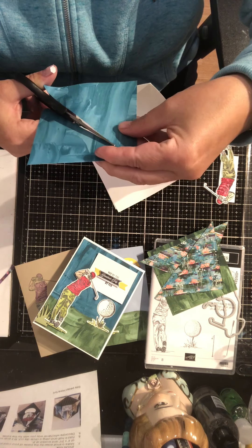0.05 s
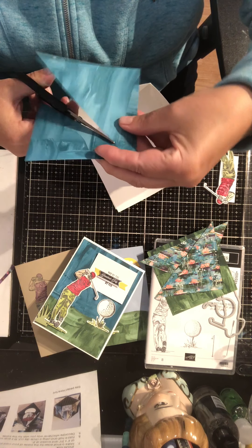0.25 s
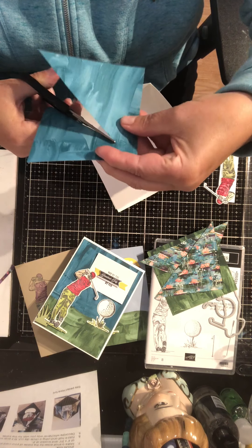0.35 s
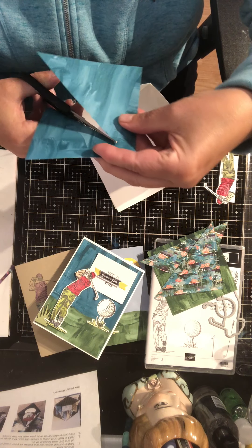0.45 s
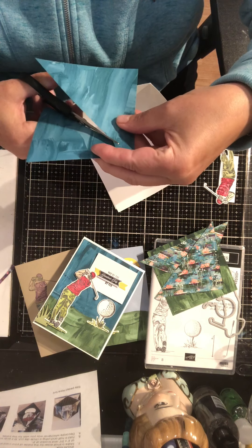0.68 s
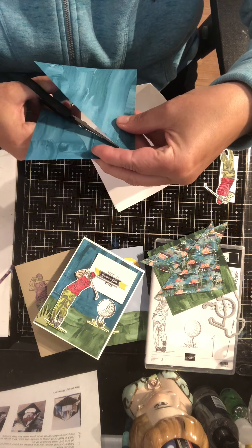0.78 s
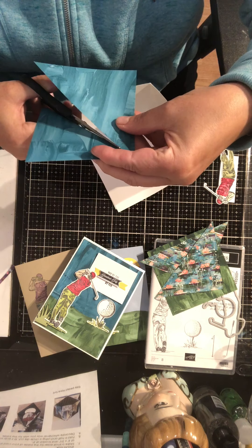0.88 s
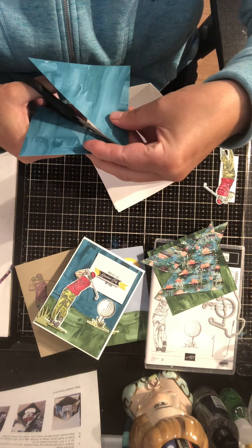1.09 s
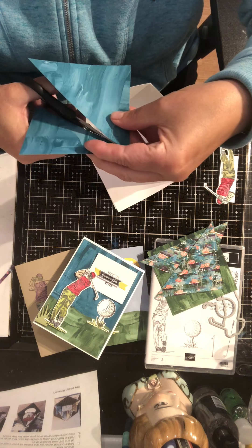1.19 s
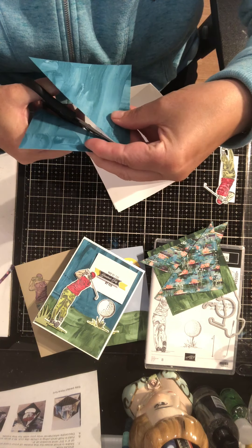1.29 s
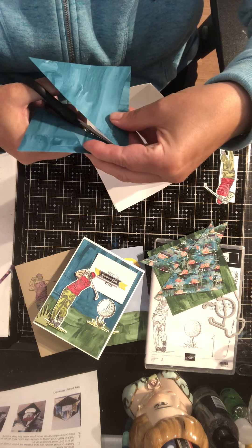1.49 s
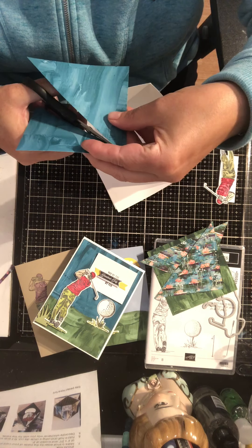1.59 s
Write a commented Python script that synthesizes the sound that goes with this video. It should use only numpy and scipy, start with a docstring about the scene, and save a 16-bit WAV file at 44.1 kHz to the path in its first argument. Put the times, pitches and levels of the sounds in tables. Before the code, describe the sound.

Small scissors cut stiff paper close to a phone microphone in a quiet room: brief crunches, one loud clack as the blades shut, a smooth opening hiss, then softer snips and slides.

```python
"""Crunchy bites come first: small scissors snip paper close to a phone microphone in a quiet room.
The blades then knock shut with a loud clack and a low thump; opening, they slide with a smooth hiss.
Bites and slides are grainy noise and knocks are short pushes, all ringing the same blades and sheet.
Room echo and steady room tone surround them; a faint low hum swells near the end."""
import sys
import numpy as np
from scipy import signal
from scipy.fft import rfft, irfft
from scipy.io import wavfile

SR = 44100
rng = np.random.default_rng(int(sys.argv[2]) if len(sys.argv) > 2 else 0)


def gain_from_decibels(decibels):
    """Convert decibel values to linear amplitude factors."""
    exponent = np.asarray(decibels, float) / 20
    return 10 ** exponent


def log_audio(samples):
    """Write samples as a 16-bit WAV file to the path given in sys.argv[1]."""
    # one column per channel
    frames = np.atleast_2d(samples).T
    # limit to full scale, then quantise
    limited = np.clip(frames, -1, 1)
    pcm = np.round(limited * 32767).astype(np.int16)
    wavfile.write(sys.argv[1], SR, pcm)


N = 72765  # length in samples, 1.65 s


def read_spectrum(points, hz):
    """Reads a (pitch, value) table with straight lines between points on a log-pitch axis."""
    pitch_hz, value = np.transpose(points)
    return np.interp(np.log(hz + 1), np.log(pitch_hz + 1), value)


def favour(boost_db, favoured_hz):
    """Resonances near the favoured pitch are stirred harder."""
    width_octaves = 0.23
    return lambda hz: boost_db * np.exp(-(np.log2(hz / favoured_hz) / width_octaves) ** 2)


def fibres(size, grain_db):
    """Noise of tearing or rubbing fibres: short grains of unequal strength."""
    grains_per_s = 3100
    grain_levels_db = grain_db * np.minimum(rng.exponential(1, size), 4)
    grain_number = (np.arange(size) * grains_per_s / SR).astype(int)
    noise = rng.standard_normal(size) * gain_from_decibels(grain_levels_db[grain_number])
    return noise / np.sqrt(np.mean(noise ** 2))


def ring(drive, modes, stir_db):
    """Sums resonances of alternate sign; stir_db(hz) says how hard the drive reaches each."""
    out = 0
    for k, (hz, width_hz, level_db) in enumerate(modes):
        radius = np.exp(-np.pi * width_hz / SR)  # a narrower resonance rings longer
        feedback = [1, -2 * radius * np.cos(2 * np.pi * hz / SR), radius * radius]
        tone = signal.lfilter([1, 0, -1], feedback, drive * gain_from_decibels(stir_db(hz)))
        out = out + (-1) ** k * gain_from_decibels(level_db) * (1 - radius) * tone
    return out


# resonances of blades, handles and sheet: pitch_hz, width_hz, relative level_db
LOW_RING = [(290, 60, -13), (540, 30, 0), (650, 50, -2), (840, 80, -3)]
HIGH_RING = [(4466, 330, -6), (5173, 150, -2), (5615, 280, -8.5), (6180, 220, -7), (6830, 280, -8),
             (7690, 350, -8), (8600, 900, -13), (9570, 1200, -14), (12380, 1600, -11.5), (13100, 1800, -15),
             (15200, 1800, -16.5)]
# middle resonances of the blades: pitch_hz, width_hz
BLADE_SHAPES = [(1220, 90), (1390, 80), (1660, 70), (1800, 70), (2130, 80), (2300, 130), (2600, 110),
                (2770, 80), (3180, 90), (3560, 170), (3930, 130), (4170, 170)]
# one relative level_db for each blade resonance
BLADE_LEVELS = [-6, -0.5, 3, -1, -1.5, -2.5, -1.5, -4, 0, -7.5, -2, -5]


def body(drive, low_db, tilt_db, stir_db):
    """The drive rings the low, middle and high resonances of the scissors and sheet."""
    low_answer_db, tilt_from_hz = 10.5, 3740
    blade_modes = np.column_stack([BLADE_SHAPES, BLADE_LEVELS])
    low = ring(drive, LOW_RING, lambda hz: low_db + low_answer_db)
    middle = ring(drive, blade_modes, stir_db)
    high = ring(drive, HIGH_RING, lambda hz: stir_db(hz) + tilt_db * np.log2(hz / tilt_from_hz))
    return low + middle + high


# bites and ticks of the closing blades: peak_s, level_db, rise_ms (per 20 dB), fall_ms (per 20 dB),
# relative low_ring_db, treble_tilt_db (per octave), favoured_hz
BITES = [(.004, -38, 21.6, 12.6, -13, -2.5, 1570), (.020, -45, 7.4, 13.7, -9, 4.5, 2230),
         (.036, -39.5, 3.6, 4, -17, -6, 4240), (.049, -36, 7.7, 7.5, -8.5, 0.5, 3000),
         (0.113, -65.5, 4.6, 6.4, -36, 3, 3780), (0.143, -56.5, 16, 7.5, -7.5, 0, 1710),
         (.173, -57, 8.2, 5, -23, 1, 2900), (.226, -57, 20, 15, -7.5, -10, 2450),
         (0.237, -43.5, 4.4, 2.2, -24, -8, 2780), (0.2419, -34, 1.3, 3.4, -21, -2, 7720),
         (0.2453, -20, 3.4, 6, -8, -12, 1435), (0.2476, -11.5, 3, 2.5, -25, -15, 2300),
         (0.2521, -31, 0.99, 9.1, -0.5, -2.5, 2260), (0.2622, -39.5, 4, 17, -1, -24, 2200),
         (.694, -48.5, 1.2, 5.2, -9.5, 1, 2150), (0.7283, -53, 1.9, 14, -2, -5, 4350),
         (.7365, -43.5, 1.5, 17, -1.5, -5, 3320), (.7415, -42, 13, 6, -10, -6.5, 3340),
         (0.7503, -36, 13, 8.6, -9.5, 2, 3790), (0.7641, -35.5, 8.1, 7.1, -11, -2, 3230),
         (0.7925, -36.5, 1.2, 8.2, -7, 1.5, 3300), (0.7964, -33, 4.4, 5.3, -5.5, -2, 3200),
         (1.1615, -49, 0.86, 4, -10, 1, 2630), (1.223, -53.5, 4.5, 4.7, -13, 2, 3500),
         (1.234, -43, 12.3, 10.7, -10.5, -3.5, 2500), (1.249, -45, 0.82, 20, -14, -3, 1900),
         (1.262, -42, 3, 12.5, -13, -9, 1660), (1.270, -50, 3, 28, -6, 2, 2600),
         (1.283, -41.5, 4, 9.8, -12, -12, 1600), (1.297, -42.5, 9, 3.6, -13, -0.5, 2100),
         (1.424, -58, 3, 5, -15, -2, 3200)]


def bites():
    """Each bite of fibre noise swells, dies quickly and leaves the blades ringing."""
    before, size = 1024, 4096  # samples ahead of the peak, samples in all
    favour_db, grain_db = 8.5, 4
    spread_db = 1.1  # random spread of each middle and high resonance's level, drawn anew for each bite
    t_ms = (np.arange(size) - before) / SR * 1000
    out = np.zeros(N + size)
    for peak_s, level_db, rise_ms, fall_ms, low_db, tilt_db, favoured_hz in BITES:
        shape = gain_from_decibels(np.where(t_ms < 0, 20 * t_ms / rise_ms, -20 * t_ms / fall_ms))
        favoured_db = favour(favour_db, favoured_hz)
        stir_db = lambda hz: favoured_db(hz) + spread_db * rng.standard_normal()
        sound = body(fibres(size, grain_db) * shape, low_db, tilt_db, stir_db)
        # give the ringing sound the same energy as its shape
        sound = sound * np.sqrt(np.sum(shape ** 2) / np.sum(sound ** 2))
        at = round(peak_s * SR)
        out[at:at + size] += gain_from_decibels(level_db) * sound
    return out[before:N + before]


# colour of the room tone: pitch_hz, relative level_db (per Hz)
AIR_COLOUR = [(15, -47.5), (25, -13), (206, -4.5), (624, -13), (962, -16.5), (1130, -15), (1650, -22),
              (5730, -25.5), (6560, -23), (7710, -29), (16000, -34)]


def air():
    """Steady room tone: noise shaped to one fixed spectrum."""
    spectrum = rfft(rng.standard_normal(N)) * gain_from_decibels(read_spectrum(AIR_COLOUR, np.fft.rfftfreq(N, 1 / SR)))
    noise = irfft(spectrum, N)
    return gain_from_decibels(-70.5) * noise / np.sqrt(np.mean(noise ** 2))


# how long the echo lasts: pitch_hz, decay_s (time to fall 60 dB)
ROOM_DECAY = [(150, 0.45), (600, 0.15), (2500, 0.27), (6000, 0.15), (14000, 0.17)]
# colour of the echo as it starts: pitch_hz, relative level_db
ROOM_COLOUR = [(200, 5), (1000, 3.5), (2500, -9), (6000, 4.5), (14000, -6)]


def room(near):
    """Three noise tails that die by band, fed in turn so that like hits do not ring alike."""
    out = np.zeros(N)
    for k in range(3):
        hz, t, noise = signal.stft(rng.standard_normal(SR // 2), SR, nperseg=256)
        start_db = read_spectrum(ROOM_COLOUR, hz)[:, None]
        fade_db = 60 * t / read_spectrum(ROOM_DECAY, hz)[:, None]
        tail = signal.istft(noise * gain_from_decibels(start_db - fade_db), SR, nperseg=256)[1]
        tail[:200] = 0  # the echo arrives after about 4.5 ms
        turn = np.sqrt(2 / 3) * np.cos(np.pi * (np.arange(N) / SR * 40 + k / 3))  # 20 Hz, offset per tail
        out += signal.fftconvolve(near * turn, tail / np.linalg.norm(tail))[:N]
    return gain_from_decibels(-17) * out


# the blades knock together: start_s, peak_db, contact_ms, relative low_ring_db, favoured_hz
CLACKS = [(.140, -47, .45, -32, 1644), (.1715, -47.5, 0.414, -29.5, 1675),
          (0.2484, -12.5, .12, -18.5, 2300), (.2595, -20.5, 0.39, -11, 2215), (.796, -39, 0.089, -7, 3180)]


def clacks():
    """One hard, short contact, half a sine wave long, rings everything at once."""
    t_ms = np.arange(4096) / SR * 1000
    out = np.zeros(N)
    for start_s, peak_db, contact_ms, low_db, favoured_hz in CLACKS:
        contact = np.sin(np.pi * np.minimum(t_ms / contact_ms, 1))
        sound = body(contact, low_db, 0, favour(1, favoured_hz))
        out[round(start_s * SR):][:len(t_ms)] += gain_from_decibels(peak_db) * sound / abs(sound).max()
    return out


def thump():
    """The clack shakes hand and table: a short low push, sinking in pitch."""
    start_s, peak_db, rate_per_s = 0.250, -51, 95
    start_hz, end_hz = 260, 75
    t = np.maximum(np.arange(N) / SR - start_s, 0)
    hz = end_hz + (start_hz - end_hz) * np.exp(-t * rate_per_s)
    push = np.e * t * rate_per_s * np.exp(-t * rate_per_s)  # rises to 1, then dies away
    return gain_from_decibels(peak_db) * push * np.sin(2 * np.pi * np.cumsum(hz * (t > 0)) / SR)


# blades sliding open along the sheet, one list per slide: time_s, relative level_db,
# relative low_ring_db, relative sheet_flex_db, treble_tilt_db (per octave), favoured_hz
SLIDES = [
    [(.397, -83, -12, -3, 9.5, 1700), (.409, -55.5, -2, -30, -4.5, 1900),
     (.44, -49.5, -8.5, -26.5, -6.5, 2200), (.475, -49.5, -4, -30, -3, 4400),
     (.50, -53, -9, -32.5, -3, 4300), (.559, -64.5, -9.5, -20, -7, 1650), (.575, -75, -3.5, -18, 1, 1700),
     (.595, -86, -15, -22, -6, 1910), (.605, -65, -13.5, -35, -5, 1900), (.629, -69.5, -5, -18, -9, 1770),
     (.64, -98, -12, -4, -5, 1860)],
    [(.948, -96.5, -1, -0.5, -7, 2790), (.957, -57.5, -9, -20, -10.5, 2920),
     (.969, -48, -11, -29.5, -3, 3000), (.995, -54.5, -10, -19, 3, 5400),
     (1.022, -49.5, -12, -22, 2.5, 7600), (1.037, -50, -11, -30, -1, 4000),
     (1.06, -52.5, -18, -32, -3.5, 3500), (1.083, -56.5, -12, -29, -3, 2360),
     (1.11, -100, 0, -12.5, 0, 2100)],
    [(1.451, -75.5, 6, -2.5, -4, 1844), (1.463, -55.5, -12.5, -36, -5.5, 1700),
     (1.49, -56.5, -10.5, -32.5, -4, 1700), (1.525, -55, -15, -47, -3.5, 2300),
     (1.561, -59.5, -12.5, -33, -3, 1660), (1.575, -64.5, -7.5, -36, -6, 1810),
     (1.607, -74.5, -5.5, -25, -6, 2000), (1.65, -71, -5, -20, -9, 1880)],
]
# the free sheet bending: pitch_hz, width_hz, relative level_db
FLEX_RING = [(176, 119, -5), (264, 90, 6), (395.3, 34, 7)]


def slides():
    """Dense fine friction while the blades open; the sheet bends with them."""
    ring_answer_db, flex_answer_db = 11.5, 19  # how readily a slide rings the blades and bends the sheet
    favour_db, grain_db = 5, 2
    out, t = np.zeros(N), np.arange(N) / SR
    for rows in SLIDES:
        time_s, level_db, *rest = np.transpose(rows)
        low_db, flex_db, tilt_db, favoured_hz = (np.interp(t, time_s, column) for column in rest)
        level_now_db = ring_answer_db + np.interp(t, time_s, level_db, -150, -150)
        drive = fibres(N, grain_db) * gain_from_decibels(level_now_db)
        out += body(drive, low_db, tilt_db, favour(favour_db, favoured_hz))
        out += ring(drive, FLEX_RING, lambda hz: flex_db + flex_answer_db)
    return out


# path of the low hum: time_s, pitch_hz, level_db (rms)
HUM = [(1.28, 116.2, -86), (1.316, 109, -80), (1.42, 103, -72), (1.552, 105.6, -84), (1.604, 109, -83),
       (1.65, 104, -77)]


def hum():
    """A faint low sine tone whose pitch and level drift along the table."""
    time_s, pitch_hz, level_db = np.transpose(HUM)
    t = np.arange(N) / SR
    phase = 2 * np.pi * np.cumsum(np.interp(t, time_s, pitch_hz)) / SR
    return np.sqrt(2) * gain_from_decibels(np.interp(t, time_s, level_db, -150)) * np.sin(phase)


def scene():
    """Scissors and thump, their echo in the room, the room tone and the hum."""
    near = bites() + clacks() + thump() + slides()
    return (near + room(near) + air() + hum())[None]


def band_limit(x):
    """A steep low-pass at the top of the band."""
    return signal.sosfilt(signal.butter(12, 16520, fs=SR, output="sos"), x)


# band limits of the phone: lower_hz, upper_hz
EDGES_HZ = [45, 16250]


def record(dry):
    """The phone rolls off the deep bass and cuts the top treble steeply."""
    lower_hz, upper_hz = EDGES_HZ
    bass_cut = signal.butter(2, lower_hz, "high", fs=SR, output="sos")
    treble_cut = signal.cheby2(10, 30, upper_hz, fs=SR, output="sos")
    mix = signal.sosfilt(treble_cut, signal.sosfilt(bass_cut, dry))
    return band_limit(mix)


dry = scene()
out = record(dry)
log_audio(out)
```